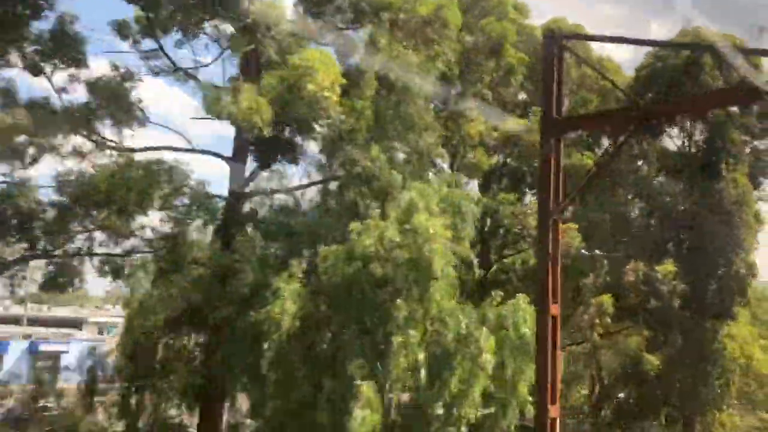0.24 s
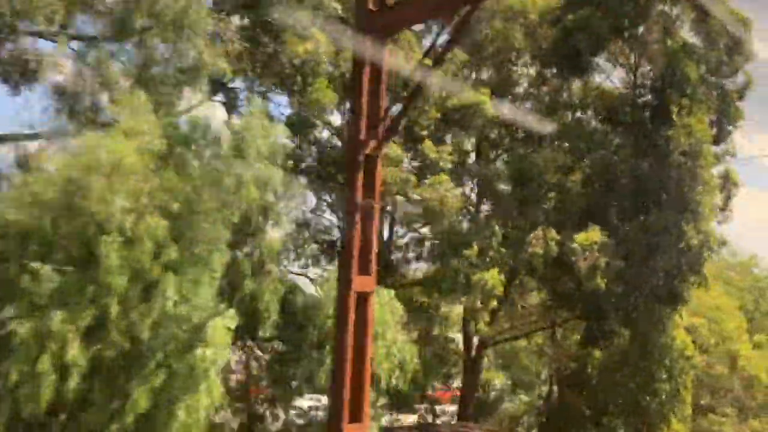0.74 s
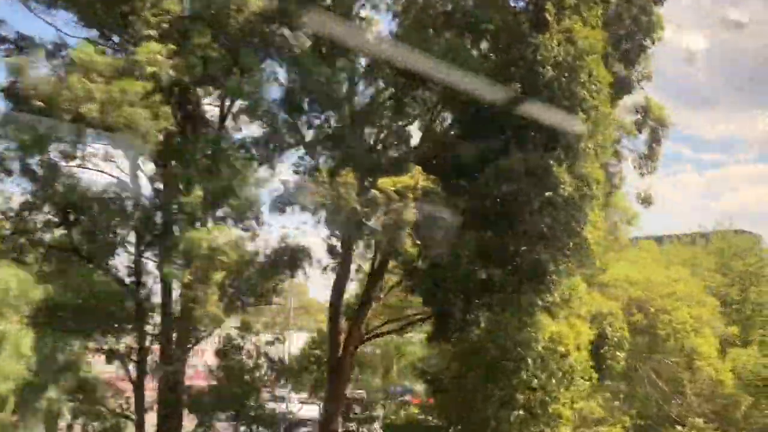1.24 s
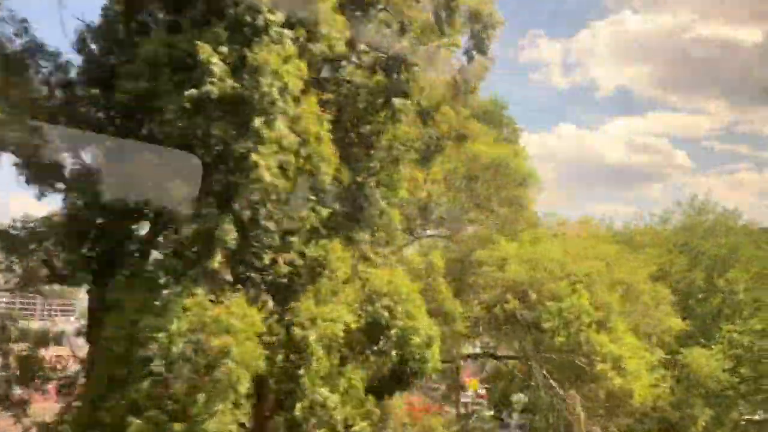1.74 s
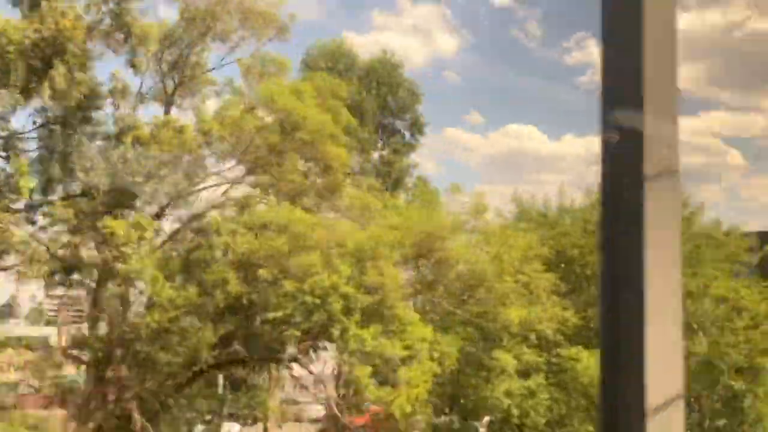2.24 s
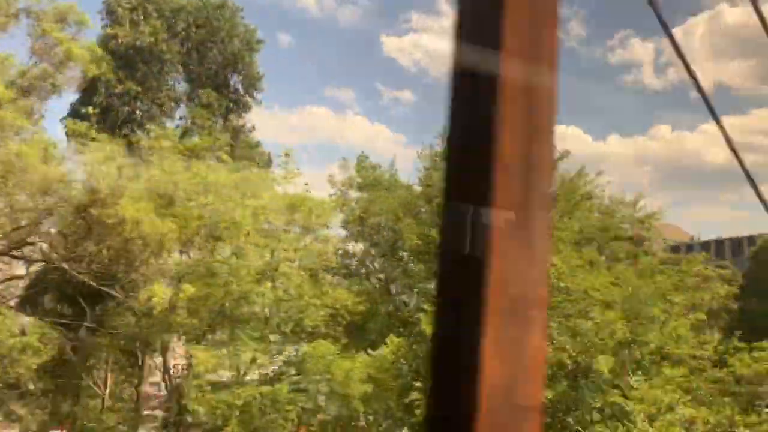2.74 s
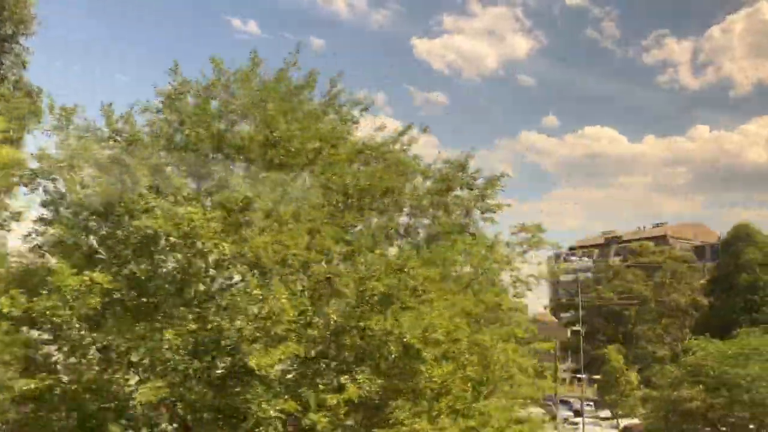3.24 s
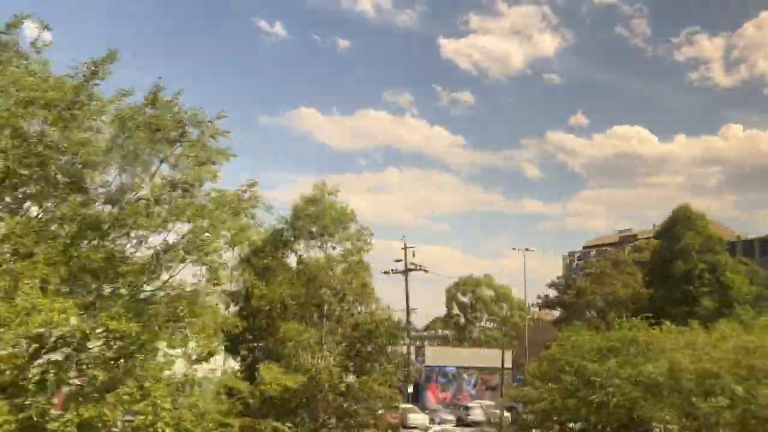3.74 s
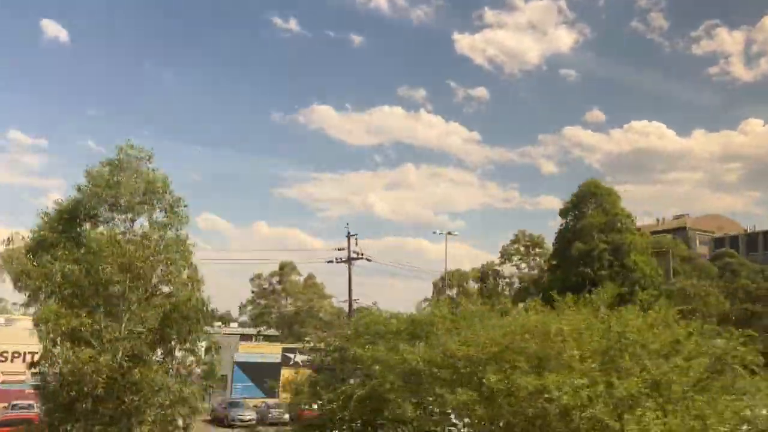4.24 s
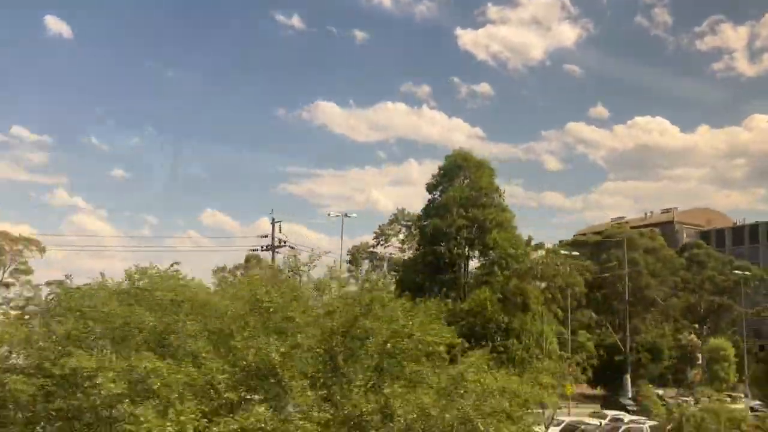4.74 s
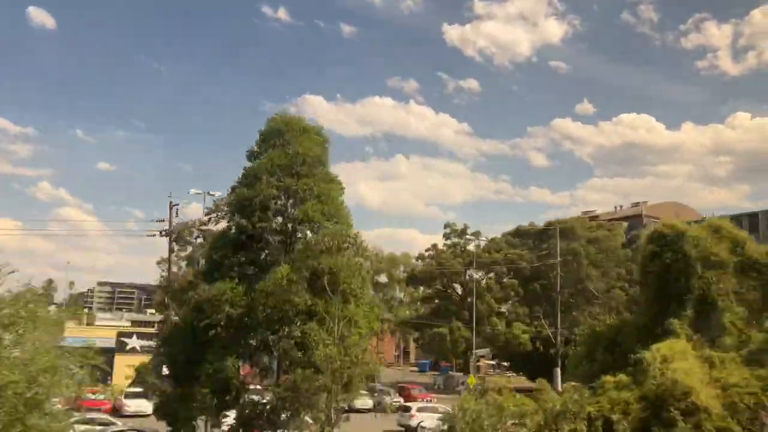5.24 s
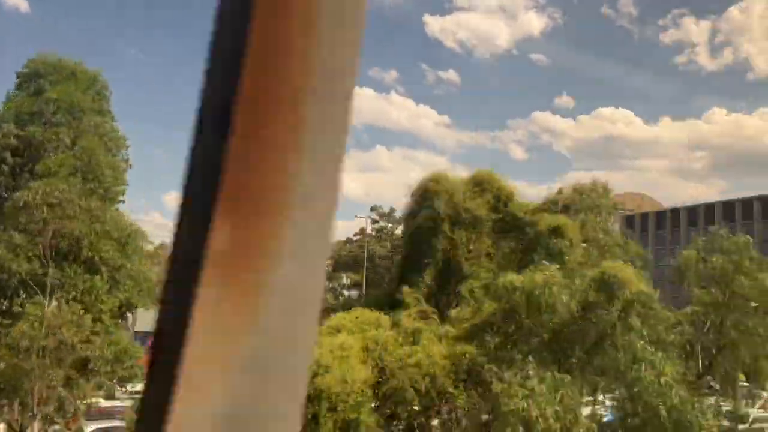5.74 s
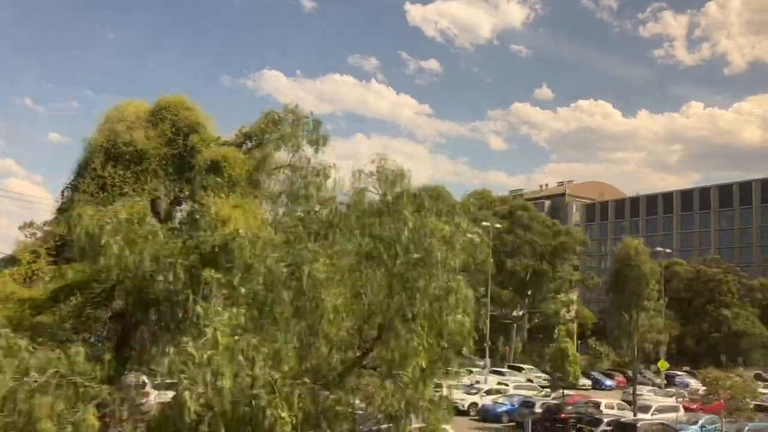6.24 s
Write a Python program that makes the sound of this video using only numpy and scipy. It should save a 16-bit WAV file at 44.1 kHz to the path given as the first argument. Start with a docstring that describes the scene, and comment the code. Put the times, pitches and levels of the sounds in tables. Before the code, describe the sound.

The interior of an electric passenger train running at an even speed, heard by two microphones in the carriage. From 0 to 6.5 seconds a deep wheel rumble and boomy body drone dominate, gently uneven, with a low electric hum beating roughly five times a second. A faint steady whine slowly swells and fades, and soft broad air rushes from the vents. Very thin, high flange squeals flicker at 0.2 and around 0.7-1.2 seconds; fine rustles come and go. Just after 3.1 seconds loose fittings give a dry cluster of ticks, with a thin squeal at 3.35 and another tick at 3.9. The rumble is heavier from 3 to 4, then eases, surging again near 5 and 6. The hum sinks slightly after 4; a soft short tone rises at 4.5. The strongest, still faint squeals come at 5.45, 5.85 and 6.05. It ends still rolling.

```python
"""Inside the carriage of an electric train at an even speed, on two microphones, for six and a half seconds.
From the start shaped noise gives the wheels' rumble and the air in the vents, and sines give the beating hum
of shaft and motor and two whines almost in unison. Flanges squeal as gliding tones in the first second, noise
bursts rustle in the treble, and fittings tick as cracks of noise, most strongly just after 3 s. Past 4 s the
shaft slows more clearly and a soft rising tone sounds; the strongest squeals come from 5.4 s on."""
import sys
import numpy as np
from scipy import signal
from scipy.fft import rfft, irfft
from scipy.io import wavfile

SR = 44100
rng = np.random.default_rng(int(sys.argv[2]) if len(sys.argv) > 2 else 0)


def pcm_store(signal):
    """Save signal as 16-bit PCM."""
    levels = np.round(np.clip(np.atleast_2d(signal), -1, 1) * 32767)
    wavfile.write(sys.argv[1], SR, levels.astype(np.int16).T)


N = 285768

# Rolling noise as the track changes:
# (time [s], floor rumble level [dB], body drone level [dB], wall panel level [dB])
ROLLING_LEVELS = [(0, -33, -32, -48.5), (.5, -33, -35, -49), (1.2, -34, -35, -50), (1.8, -32, -37, -49.5),
                  (2.5, -34.5, -33, -50.5), (3.0, -29.5, -35, -50.5), (3.5, -29, -33, -45.5),
                  (3.9, -28.5, -34, -50.5), (4.3, -39.5, -33, -50.5), (4.75, -37.5, -34.5, -51),
                  (5.0, -26.5, -32.5, -50.5), (5.5, -35, -35.5, -51), (6.0, -27, -35.5, -49.5),
                  (6.48, -39, -33.5, -52)]
# Colour of the rumble through the floor: (frequency [Hz], relative density [dB per Hz])
RUMBLE_COLOUR = [(20, -24.5), (30, -13.5), (40, -13), (60, 1), (76, 0), (88, -22.5), (110, -15.5),
                 (160, -30)]
# Colour of the carriage body's drone: (frequency [Hz], relative density [dB per Hz])
DRONE_COLOUR = [(80, -22.5), (96, -4), (110, 1.5), (140, -6.5), (180, -5.5), (220, -11.5), (255, -6.5),
                (275, -11.5), (300, -13), (335, -15), (370, -13), (440, -27), (600, -42.5)]
# Colour of the wall panels' hum: (frequency [Hz], relative density [dB per Hz])
PANEL_COLOUR = [(330, -5), (430, -6), (490, 1), (545, -6), (610, -1.5), (645, -5), (720, -6.5),
                (760, -10.5), (850, -10.5), (950, -9), (1150, -22.5), (1500, -22.5)]


def rolling():
    """Wheels on rails shake floor, body and wall panels: three bands of noise, each with its own level."""
    rumble_db, drone_db, panels_db = in_time(ROLLING_LEVELS)
    out = amp(rumble_db) * patchy_noise(RUMBLE_COLOUR, patchy_db=0.7, rate=4.6)
    out += amp(drone_db) * patchy_noise(DRONE_COLOUR, patchy_db=0.98, rate=3.2)
    out += amp(panels_db) * patchy_noise(PANEL_COLOUR, patchy_db=1.33, rate=5.8)
    return out


# Strength of the throbbing pair, shaft's fifth and motor's second: (time [s], gain [dB])
THROB_GAIN = [(0, -0.5), (.4, -1), (.75, 2), (1.1, -1), (1.6, -2), (2.2, 1), (2.55, 1), (2.9, -1.5),
              (3.45, 2), (3.8, 0.5), (4.2, -1), (4.8, 0.5), (5.0, 0), (5.5, -2), (6.0, 0), (6.48, -3)]
BEAT_PEAK_S = .153   # a moment when the two add up


def hums():
    """Shaft and motor together: their strongest pair lies about 5 Hz apart and throbs at that rate."""
    throb = amp(in_time(THROB_GAIN)[0])
    beat_start = rng.uniform(0, 2 * np.pi)   # phase both share at the beat's peak
    return shaft_hum(throb, beat_start) + motor_hum(throb, beat_start) + motor_comb(beat_start)


# The shaft's speed: (time [s], turning rate [turns per s])
SHAFT_SPEED = [(0, 18.533), (1.5, 18.512), (3, 18.519), (4, 18.478), (4.8, 18.445), (5.6, 18.31),
               (6.48, 18.285)]
# Tones of the shaft: (multiple of the turning rate, left level [dB], right level [dB],
# left leads by [radians], gain at the first later stage of slowing [dB], gain at the second [dB])
SHAFT_TONES = [(5, -33, -32, .2, 0, 0), (2, -48, -48, 0, 0, 0), (4, -43, -43, .1, 0, 0),
               (7, -47, -49, .2, 0, 0), (10, -49, -48, -.1, 0, 0), (13, -51, -60, -.8, 0, 0),
               (15, -40, -42, .4, 0, -6), (16, -47.5, -59, 2.9, 0, -1), (17, -52, -59, 1.9, 0, 0),
               (18, -35.3, -49.3, .9, -7, -6), (19, -43, -48, 0, -3, 2), (20, -58, -47, 2.3, 0, 7),
               (21, -47, -59, -.2, -1, -2.5), (23, -53, -51, -1.1, -5, -8), (24, -62, -69, .4, 0, 0),
               (26, -63, -70, 2, 0, 0), (27, -56, -72, -.7, -4, -4), (29, -64, -72, 2, 0, 0),
               (31, -72, -65, 2, 0, 0), (39, -57, -58, -2.5, -6, -6), (40, -66, -74, -2.6, 0, 0)]
# Turning rates [turns per s] where the hum begins to change, then its two later stages
SLOWING_STAGES = 18.478, 18.44, 18.32


def shaft_hum(throb, beat_start):
    """Multiples of the turning rate; as it falls, each slides along the carriage's resonances."""
    speed = in_time(SHAFT_SPEED)[0]
    angle = 2 * np.pi * np.cumsum(speed) / SR
    angle = angle - angle[round(BEAT_PEAK_S * SR)]
    starts = rng.uniform(0, 2 * np.pi, len(SHAFT_TONES))
    starts[0] = beat_start   # the first row is the throbbing fifth multiple
    out = np.zeros((2, N))
    for (multiple, left_db, right_db, lead, *gains_db), start in zip(SHAFT_TONES, starts):
        # negated so that the falling speeds ascend for interp
        slowing_db = np.interp(-speed, -np.array(SLOWING_STAGES), (0, *gains_db))
        level = amp(slowing_db + 0.73 * drift(1.2))
        if multiple == 5:
            level = level * throb
        out += level * sine(round(multiple) * angle + start, left_db, right_db, lead)
    return out


MOTOR_HZ = 48.766
# Motor hum: (time [s], first harmonic [dB], second harmonic [dB], third harmonic [dB])
MOTOR_LEVELS = [(0, -39, -42, -40), (1, -46, -32.5, -40), (2.7, -35, -32, -37.5), (4.2, -32, -31.5, -44),
                (4.8, -30.5, -31.5, -43), (6.48, -31, -33.5, -42)]


def motor_angle(beat_start):
    """Phase of the motor's steady pitch; doubled, it meets the shaft's fifth at the beat's peak."""
    return 2 * np.pi * MOTOR_HZ * (np.arange(N) / SR - BEAT_PEAK_S) + beat_start / 2


def motor_hum(throb, beat_start):
    """Three harmonics of the motor's steady pitch, equal at both microphones."""
    angle = motor_angle(beat_start)
    first_db, second_db, third_db = in_time(MOTOR_LEVELS)
    out = sine(angle, first_db, first_db, 0)
    out += throb * sine(2 * angle, second_db, second_db, 0)
    return out + sine(3 * angle, third_db, third_db, 0)


# The motor's faint upper comb: (multiple of half the motor pitch, left level [dB], right level [dB])
COMB_TONES = [(17, -58, -61), (20, -64, -60), (21, -63, -70), (25, -63, -65), (28, -70, -68),
              (29, -64, -64), (31, -67, -70), (32, -69, -71), (33, -69, -72), (35, -71, -72),
              (36, -75, -75), (37, -70, -70), (38, -70, -72), (39, -73, -70)]


def motor_comb(beat_start):
    """Faint upper multiples of half the motor pitch, each drifting slightly in level."""
    angle = motor_angle(beat_start)
    out = np.zeros((2, N))
    for multiple, left_db, right_db in COMB_TONES:
        phase = multiple * angle / 2 + rng.uniform(0, 2 * np.pi)
        lead = at_hz(PAIR_LEAD, multiple * MOTOR_HZ / 2)
        out += amp(0.82 * drift(0.98)) * sine(phase, left_db, right_db, lead)
    return out


WHINES_HZ = 658.27, 659.0   # the lower lies near the motor's 27th half-multiple
WHINE_SINK_HZ_PER_S = .02   # the second whine sinks slightly in pitch
WHINES_CANCEL_S = .05       # a moment when the two are opposed
WHINE_DB = -48.5, -53.5     # both whines in step at the (left, right) microphone
WHINE_LEAD = -1.1           # left leads by [radians]
# Balance of the whines: (time [s], second whine minus first [dB])
WHINES_BALANCE = [(0, 1), (1.5, -3.5), (2.8, -7), (4.4, -1), (5.1, -4), (5.8, -8), (6.48, -8)]


def whines():
    """Two whines almost in unison swell and fade slowly as they fall in and out of step."""
    t = np.arange(N) / SR - WHINES_CANCEL_S
    second_share = 1 / (1 + amp(-in_time(WHINES_BALANCE)[0]))
    first_phase = 2 * np.pi * WHINES_HZ[0] * t
    second_phase = 2 * np.pi * (WHINES_HZ[1] - WHINE_SINK_HZ_PER_S * t / 2) * t
    out = (1 - second_share) * sine(first_phase, *WHINE_DB, WHINE_LEAD)
    return out - second_share * sine(second_phase, *WHINE_DB, WHINE_LEAD)


# Fittings that tick in the carriage: (time [s], level before colouring [dB])
TICK_TIMES = [(0.7164, -56), (1.2094, -58.5), (3.1068, -40), (3.1904, -50), (3.2155, -45), (3.2215, -48),
              (3.8776, -47)]
# Colour of a tick: (frequency [Hz], gain [dB])
TICK_TONE = [(1200, -24), (2400, 9), (3400, 11), (5000, -1.5), (8000, -2), (12000, -14.5), (15000, -7)]
TICK_CRACKS, TICK_SPREAD_S = 3, .004   # each tick is a quick run of cracks


def ticks():
    """Each tick is a dry crackle of a few cracks, each weaker than the last, with a faint tail."""
    t = np.arange(round(.08 * SR)) / SR
    attack = np.minimum(t / .0003, 1)
    shape = attack * (np.exp(-t / .0014) + amp(-22) * np.exp(-t / .015))
    out = np.zeros((2, N))
    for s, db in TICK_TIMES:
        for crack in range(TICK_CRACKS):
            late = TICK_SPREAD_S * (crack + rng.uniform(-0.28, 0.27)) / TICK_CRACKS
            at = round((s + late) * SR)
            noise = rng.standard_normal((2, len(t)))
            out[:, at:at + len(t)] += amp(db - 2.5 * crack) * shape * noise
    hz, pair = heard_by_pair(out)
    return irfft(pair * amp(at_hz(TICK_TONE, hz)), N)


# A short soft tone that rises, its source out of sight: start [s], rise [s], hold [s], fall [s],
# pitch at the start [Hz], pitch slide [Hz per s], level [dB], left minus right [dB]
RISING_TONE = (4.52, .04, .13, .08, 555, 560, -52, 3)


def rising_tone():
    """One soft tone swells and fades while its pitch climbs with a slight waver."""
    return short_tone(RISING_TONE, waver_hz=1.2 * drift(22), flutter_db=0.5 * drift(24), lead=.3)


# Air in the vents: (time [s], level [dB])
AIR_LEVEL = [(0, -55.5), (.7, -54.5), (.85, -55), (1.2, -55), (1.35, -54.5), (1.55, -55.5), (2.1, -54.5),
             (2.3, -54.5), (2.5, -54), (2.7, -54.5), (2.9, -55.5), (3.25, -54), (3.5, -54.5), (3.85, -54),
             (4.15, -55.5), (4.28, -56), (4.45, -55.5), (4.85, -56), (5.05, -54.5), (5.6, -55), (6.48, -55)]
# Colour of the air's roar: (frequency [Hz], relative density [dB per Hz])
AIR_COLOUR = [(600, -9), (1000, -2.5), (1200, 0.5), (1450, -2), (1700, -2.5), (1900, -1.5), (2120, -1.5),
              (2400, 0), (3000, -4), (3800, -10), (4500, -9.5), (6000, -17), (8000, -24), (11000, -38)]


def vent_air():
    """Air roars in the vents: broad noise with small swells."""
    return amp(in_time(AIR_LEVEL)[0]) * patchy_noise(AIR_COLOUR, patchy_db=.7, rate=10.0)


# Whistles that waver: (frequency [Hz], width [Hz], left level [dB], right level [dB])
WHISTLE_TONES = [(678, 10, -58, -64), (1132.8, 1, -63.5, -67), (9958, 30, -86, -86)]


def whistles():
    """Faint whistles: noise through sharp resonances, delayed at the left microphone."""
    out = np.zeros((2, N))
    for hz, width_hz, left_db, right_db in WHISTLE_TONES:
        tone = narrow(hz, width_hz)
        lag_radians = -at_hz(PAIR_LEAD, hz) % (2 * np.pi)
        lag = round(lag_radians / (2 * np.pi * hz) * SR)
        out += np.array([amp(left_db) * tone[SR - lag:SR - lag + N], amp(right_db) * tone[SR:]])
    return out


# Wheel flange squeals: (start [s], rise by 20 dB [s], hold [s], fall by 20 dB [s],
# pitch at the start [Hz], pitch slide [Hz per s], level [dB], left minus right [dB])
FLANGE_SQUEALS = [(0.177, .012, .015, .2, 6630, -200, -69, -1), (.23, .02, .02, .09, 6480, -300, -76, 4),
                  (.7, .03, .03, .06, 7200, -300, -74, -5), (.735, .012, .015, .03, 6720, 0, -72, -3),
                  (.92, .01, .012, .02, 6650, 0, -73, 0), (0.949, 0.015, 0.1, 0.054, 6630, -250, -63, 0),
                  (.975, .02, 0.03, .09, 6460, -900, -70, 0), (1.122, .03, 0.22, .15, 6560, -200, -79, -1),
                  (3.341, 0.05, 0.014, .09, 6600, -49, -62.5, 1),
                  (3.39, .02, .015, .22, 6380, -200, -72.5, 0), (5.447, .01, 0.055, .015, 6700, 50, -61, 2),
                  (5.54, .02, .06, .03, 6660, -2, -76, 2), (5.84, 0.044, 0.041, 0.11, 6700, -50, -59, 0),
                  (6.03, .015, 0.024, .03, 6570, -300, -63, -3),
                  (6.053, 0.022, 0.032, 0.12, 6560, -200, -58, -3)]
SQUEAL_ROUGH, SQUEAL_SMEAR_HZ = 0.4, 90   # share of irregular slipping and its width


def squeals():
    """Stick-slip ringing of a wheel: a fluttering, wavering tone, smeared by irregular slips."""
    flutter_db, waver_hz = 1.6 * drift(36), 15 * drift(40)
    slips = 1 + SQUEAL_ROUGH * drift(SQUEAL_SMEAR_HZ)
    return slips * sum(short_tone(row, waver_hz, flutter_db, lead=0.92) for row in FLANGE_SQUEALS)


# Bursts of rustle: (start [s], rise by 20 dB [s], hold [s], level [dB])
RUSTLE_BURSTS = [(0.248, 0.19, .08, -72), (.7, .04, .05, -77), (1.163, 0.045, .03, -69.5),
                 (1.308, .03, .08, -75), (1.747, 0.25, 0.21, -66.5), (2.46, .06, .02, -70),
                 (2.78, .04, 0.062, -74), (3.096, .015, 0.032, -61.5), (3.17, .04, 0.065, -67),
                 (3.617, .04, 0.11, -76.5), (3.863, 0.018, .02, -71), (4.746, 0.056, 0.053, -66.5),
                 (5.0, .04, 0.033, -70.5), (5.65, 0.15, .03, -70.5), (5.883, 0.027, 0.22, -71.5)]
# Colour of the rustle: (frequency [Hz], relative density [dB per Hz])
RUSTLE_COLOUR = [(3500, -12.5), (5800, 0), (7500, -2.5), (9000, -8), (11000, -4), (13500, -17),
                 (15500, -13)]
RUSTLE_FLOOR_DB, RUSTLE_FALL_S = -76.5, 0.069   # steady hiss; time for a burst to sink 20 dB


def rustle():
    """A fine treble hiss with bursts on top; their powers add."""
    power = amp(RUSTLE_FLOOR_DB) ** 2
    for start, rise, hold, db in RUSTLE_BURSTS:
        power = power + amp(db + swell(start, rise, hold, RUSTLE_FALL_S)) ** 2
    return np.sqrt(power) * patchy_noise(RUSTLE_COLOUR, patchy_db=1.6, rate=16.0)


# Likeness of the two microphones: (frequency [Hz], likeness [0-1])
PAIR_LIKENESS = [(40, .99), (120, .97), (200, .92), (450, .15), (580, .3), (720, .55), (850, .35),
                 (1000, .45), (1250, .3), (1500, .2), (2000, .1), (6000, .15), (7000, .62), (8800, .96),
                 (10300, .8), (15000, .9)]
# Phase between the microphones: (frequency [Hz], left leads by [radians])
PAIR_LEAD = [(30, 0), (100, .1), (340, .3), (400, -1.3), (480, -3.2), (600, -2.1), (900, -2), (1100, -2.6),
             (1500, -2.5), (3010, -11.4), (6720, -16.6), (8350, -20.9), (9000, -22), (9560, -22.4),
             (11300, -25.2), (12000, -25.4), (13400, -28.3), (14400, -28.6), (15300, -31.4)]
# Level between the microphones: (frequency [Hz], left minus right [dB])
PAIR_TILT = [(60, 0), (110, 1), (200, 3), (380, 2.5), (450, 1.5), (500, 2.5), (570, 0.5), (650, 6),
             (850, 1), (1000, 2.5), (1290, 1), (2380, 1.0), (4400, 0.0), (8120, -1.5), (15000, 2)]


def heard_by_pair(near):
    """Spectra at both microphones: the right shares part of the left, shifted in phase; the rest is its own."""
    hz = np.arange(1, N // 2 + 2) * SR / N
    alike = np.clip(at_hz(PAIR_LIKENESS, hz), 0, 1)
    left, own = rfft(near)
    shared = alike * left * np.exp(-1j * at_hz(PAIR_LEAD, hz))
    right = shared + np.sqrt(1 - alike ** 2) * own
    half_tilt_db = at_hz(PAIR_TILT, hz) / 2
    return hz, np.array([left * amp(half_tilt_db), right * amp(-half_tilt_db)])


def patchy_noise(colour, patchy_db, rate):
    """Stereo noise in overlapping bands that swell partly together, partly alone; rms of the mid is 1."""
    hz, pair = heard_by_pair(rng.standard_normal((2, N)))
    low, high = colour[0][0], colour[-1][0]
    pair = pair * amp(at_hz(colour, hz)) * (hz > low) * (hz < high)
    out, together = 0, drift(rate / 2)
    for centre in np.arange(np.log2(low), np.log2(high) + .7, .7):   # in octaves
        share = np.clip(1 - abs(np.log2(hz) - centre) / .7, 0, 1)
        swelling = amp(patchy_db * (.35 * together + drift(rate)))
        out = out + swelling * irfft(pair * share, N)
    return out / np.std(out.mean(axis=0))


def short_tone(row, waver_hz, flutter_db, lead):
    """A tone that swells once while its pitch slides evenly under the waver."""
    start, rise, hold, fall, hz, slide, level_db, pan_db = row
    since = np.clip(np.arange(N) / SR - start, 0, rise + hold + fall)
    db = level_db + swell(start, rise, hold, fall) + flutter_db
    phase = 2 * np.pi * np.cumsum(hz + slide * since + waver_hz) / SR
    return sine(phase, db + pan_db / 2, db - pan_db / 2, lead)


def swell(start, rise, hold, fall):
    """Level in dB: climbs 20 dB in the rise time, holds at 0, sinks 20 dB in each fall time."""
    t = np.arange(N) / SR - start - rise
    return 20 * np.minimum(0, np.minimum(t / rise, (hold - t) / fall))


def sine(phase, left_db, right_db, lead):
    """A tone of given rms at both microphones; the left leads by so many radians."""
    return np.sqrt(2) * np.array([amp(left_db) * np.cos(phase), amp(right_db) * np.cos(phase - lead)])


def narrow(hz, width_hz):
    """Noise twice through one resonance, with a second of run-in."""
    r = np.exp(-np.pi * width_hz / SR)
    poles = [1, -2 * r * np.cos(2 * np.pi * hz / SR), r * r]
    once = signal.lfilter([1, 0, -1], poles, rng.standard_normal(N + SR))
    return rms_one(signal.lfilter([1 - r, 0, r - 1], poles, once))


def drift(rate):
    """Random wandering of spread 1: smoothed noise, made at every 40th sample and joined by lines."""
    r = np.exp(-80 * np.pi * rate / SR)
    noise = rng.standard_normal(N // 40 + 2002)
    slow = signal.lfilter([1], [1, -2 * r, r * r], noise)[2000:]   # drop the run-in
    return np.interp(np.arange(N) / 40, np.arange(len(slow)), rms_one(slow))


def in_time(rows):
    """Columns of a table as curves over all samples."""
    s, *columns = np.transpose(rows)
    return [np.interp(np.arange(N) / SR, s, c) for c in columns]


def at_hz(points, hz):
    """A table read on a log-frequency axis."""
    table = np.array(points)
    return np.interp(np.log(hz), np.log(table[:, 0] + 1), table[:, 1])


def amp(db):
    """Decibels to gain."""
    return 10 ** (np.asarray(db) / 20)


def rms_one(x):
    """Scale to unit rms."""
    return x / np.sqrt(np.mean(x ** 2) + 1e-20)


def scene():
    """All sources as the two microphones receive them."""
    machinery = rolling() + hums() + whines()
    events = ticks() + rising_tone() + squeals()
    background = vent_air() + whistles() + rustle()
    return machinery + events + background


def record(dry):
    """A steep low-pass cuts the top; the filter runs in on a mirrored lead-in."""
    stopband_hz = 16014   # from here up at least 70 dB down
    sos = signal.cheby2(14, 70, stopband_hz, fs=SR, output="sos")
    lead_in = 2 * dry[:, :1] - dry[:, 256:0:-1]
    return signal.sosfilt(sos, np.hstack([lead_in, dry]))[:, 256:]


dry = scene()
out = record(dry)
pcm_store(out)
```